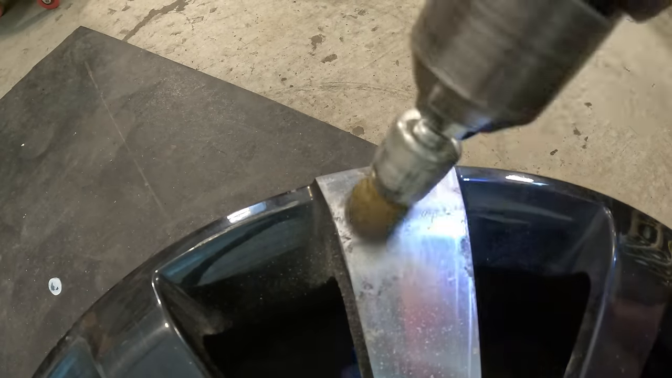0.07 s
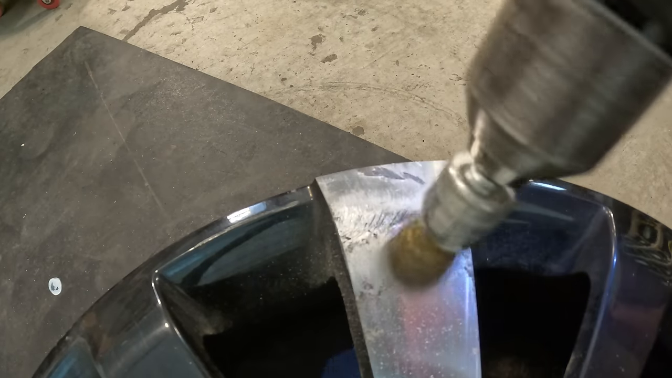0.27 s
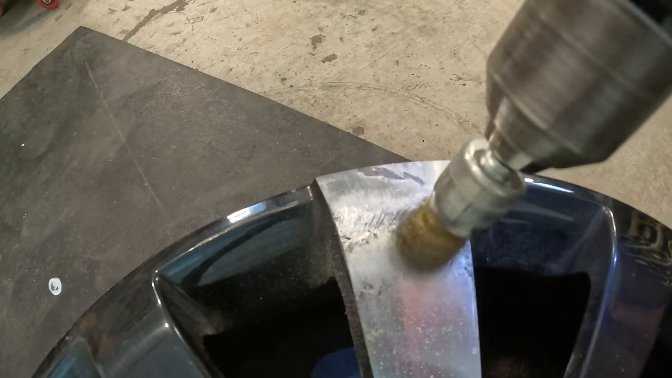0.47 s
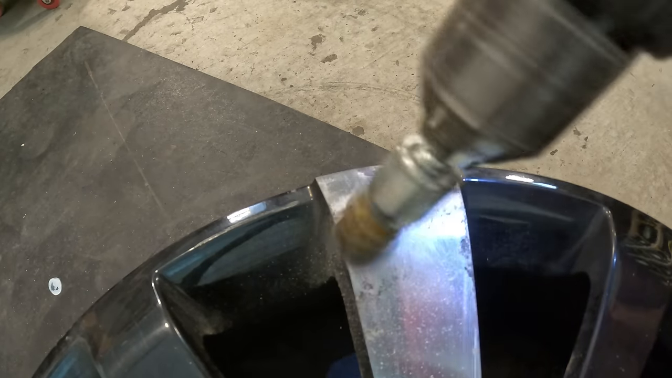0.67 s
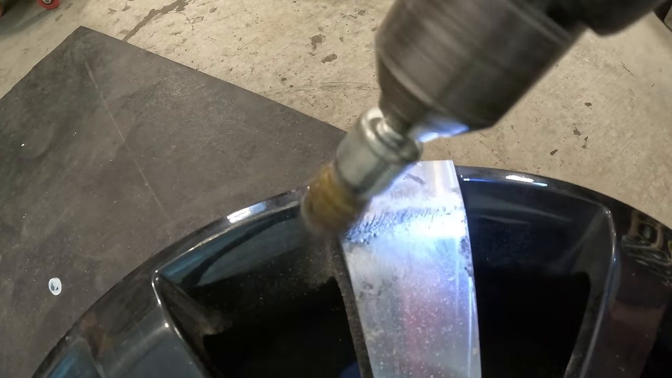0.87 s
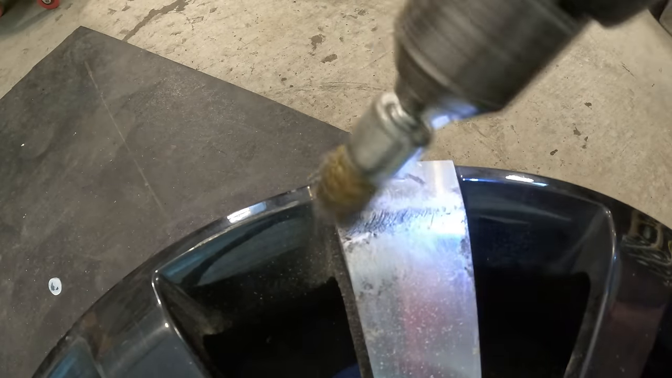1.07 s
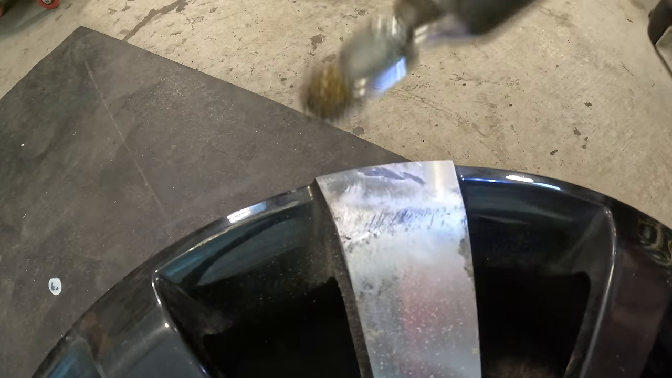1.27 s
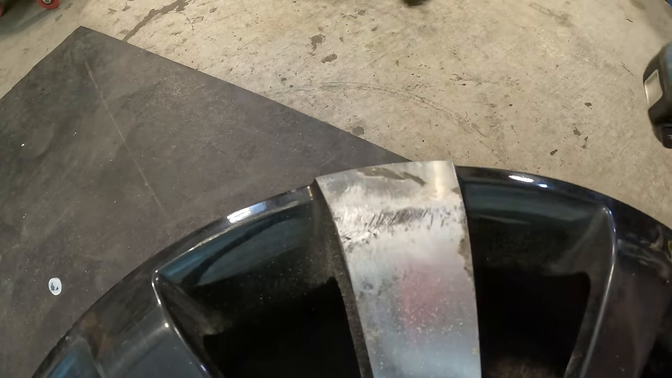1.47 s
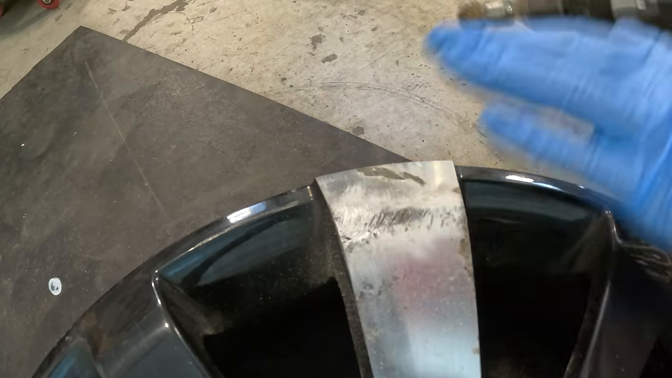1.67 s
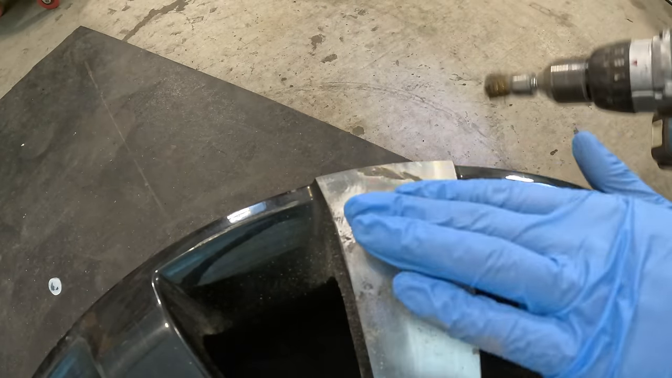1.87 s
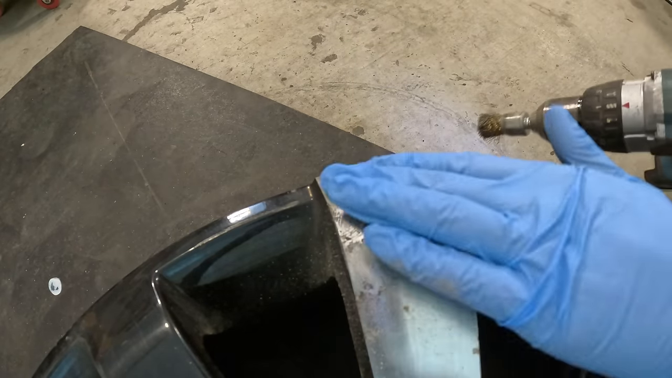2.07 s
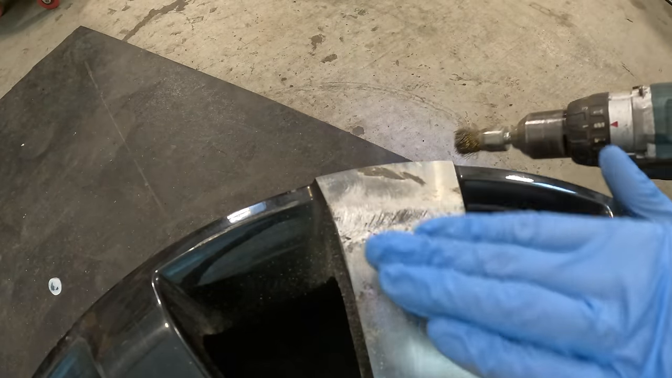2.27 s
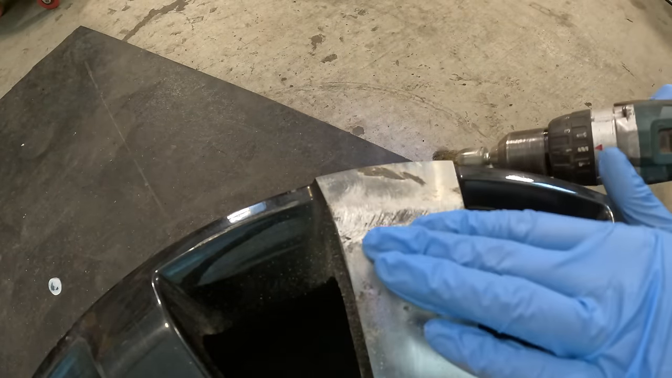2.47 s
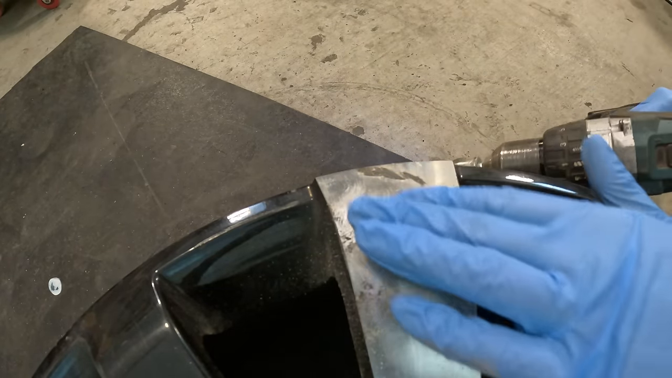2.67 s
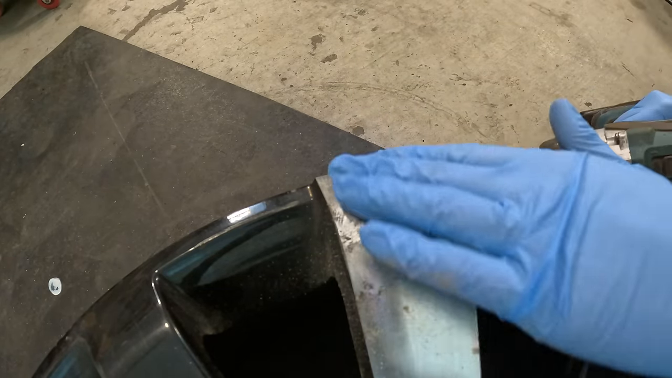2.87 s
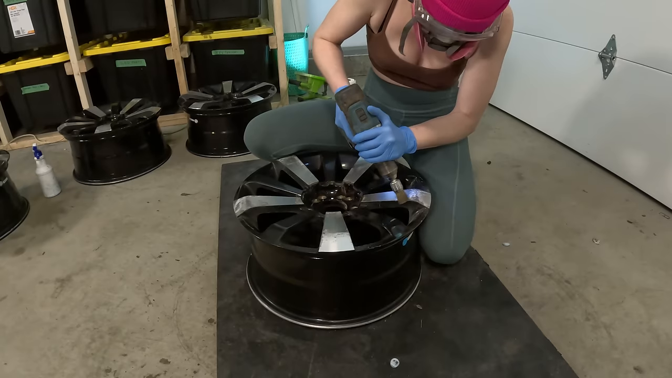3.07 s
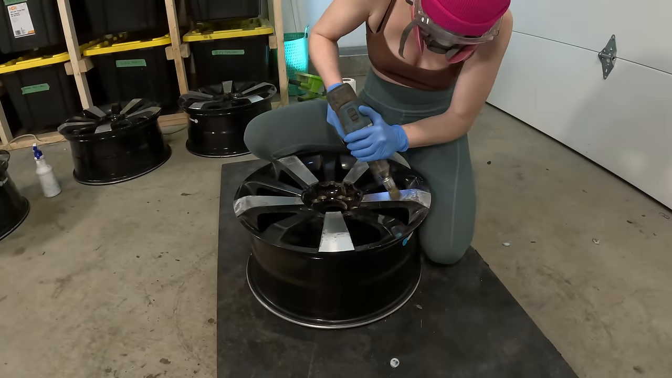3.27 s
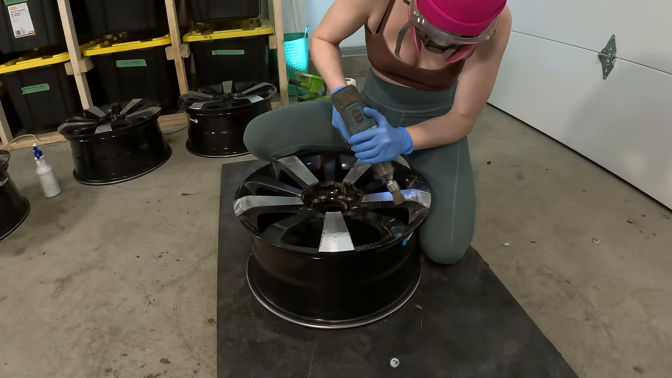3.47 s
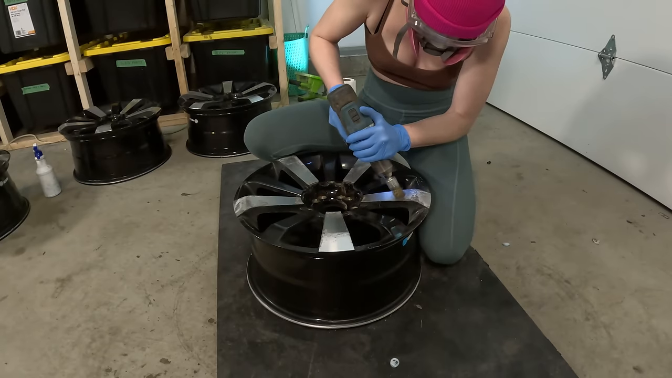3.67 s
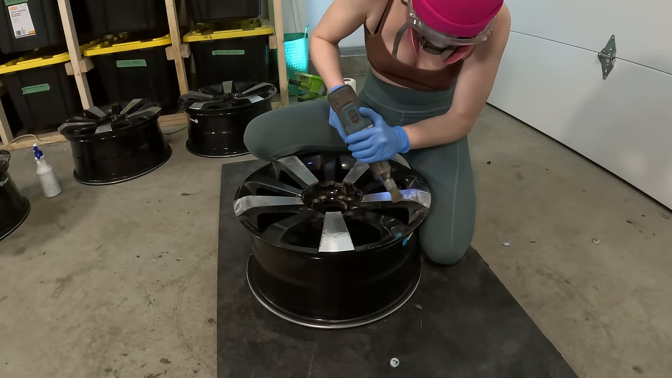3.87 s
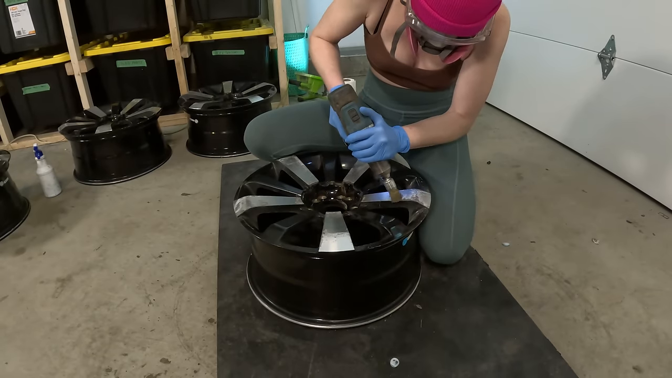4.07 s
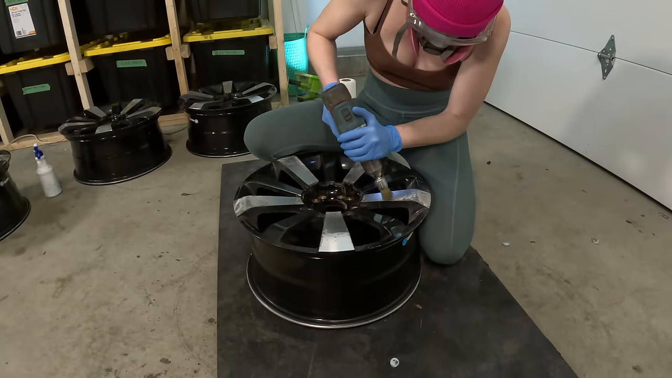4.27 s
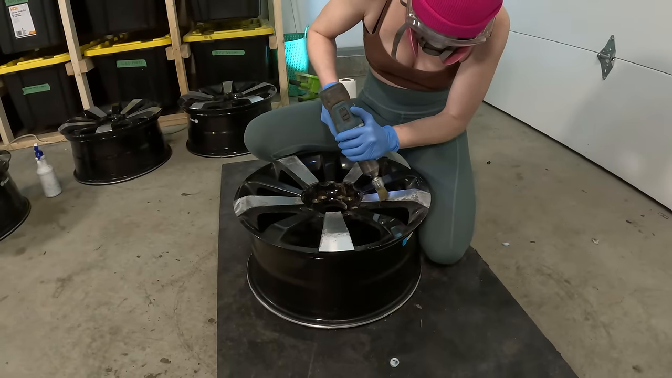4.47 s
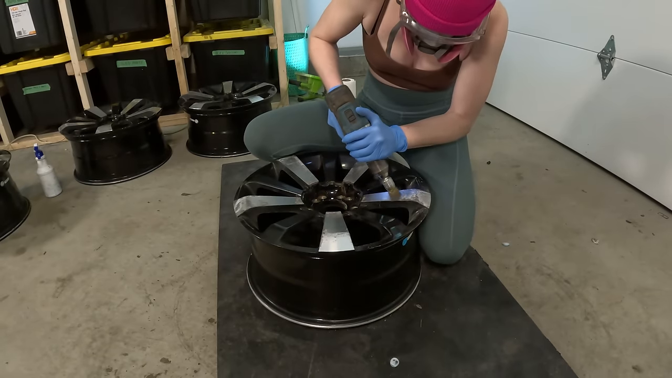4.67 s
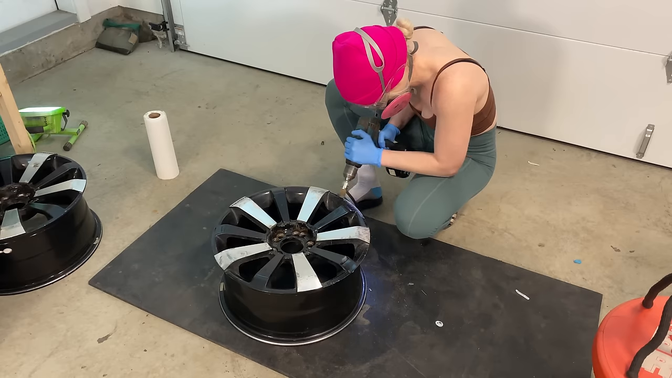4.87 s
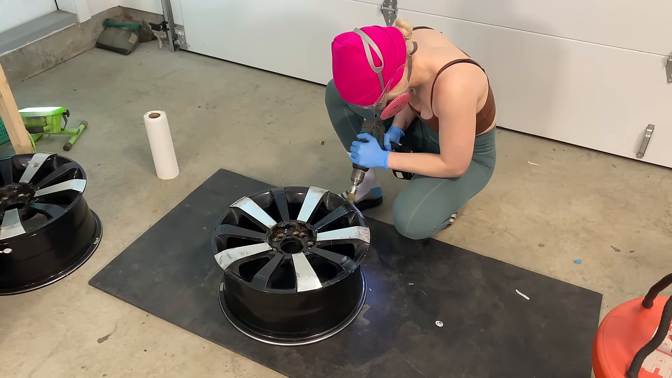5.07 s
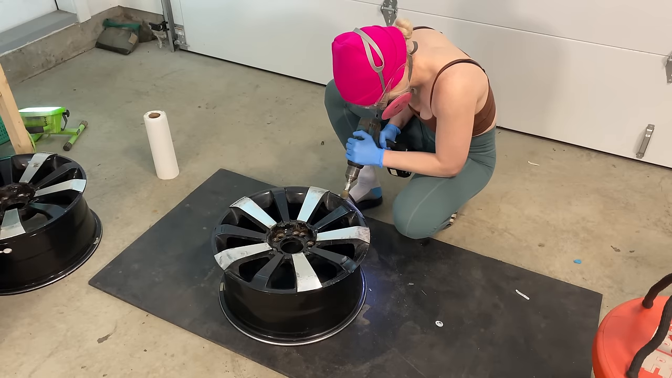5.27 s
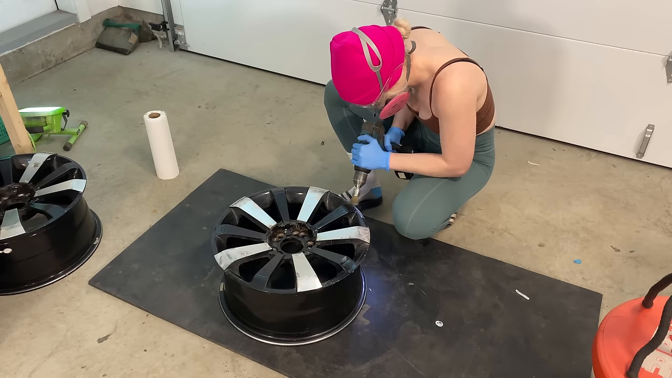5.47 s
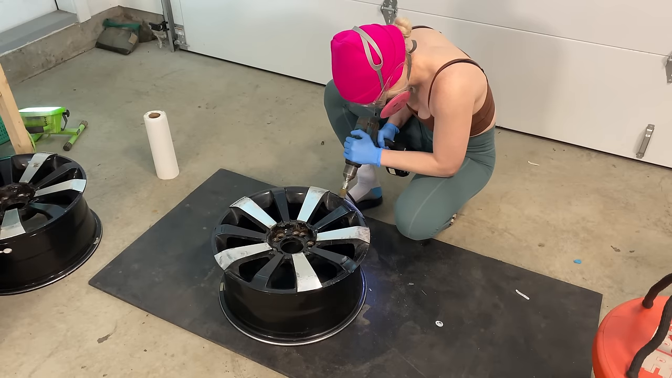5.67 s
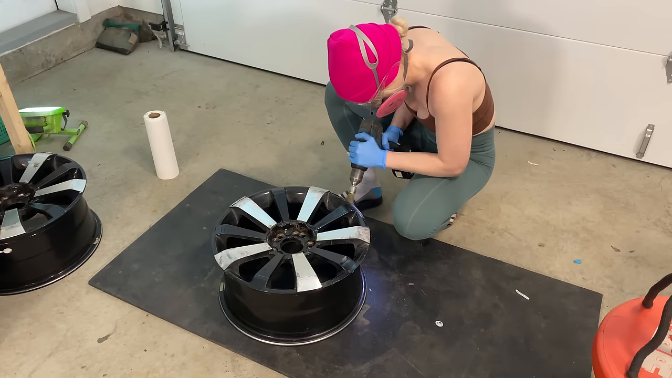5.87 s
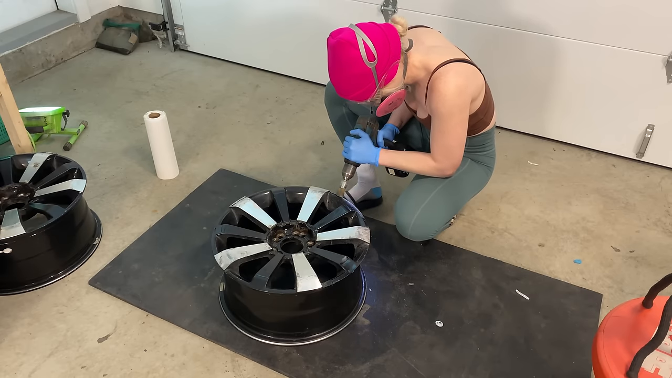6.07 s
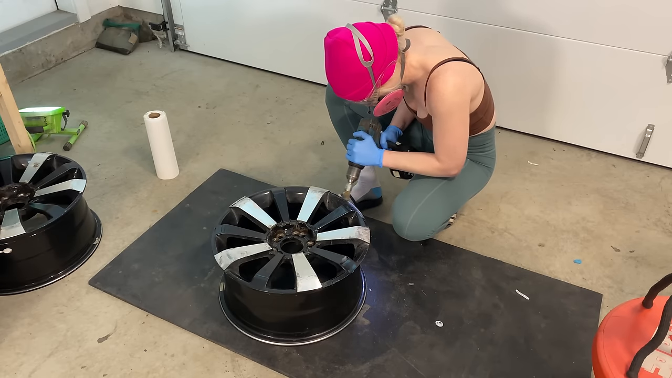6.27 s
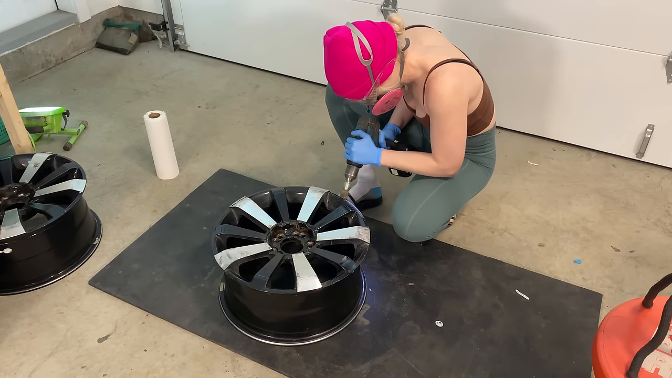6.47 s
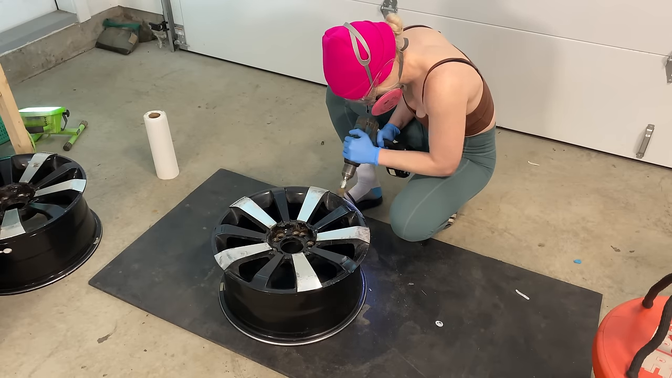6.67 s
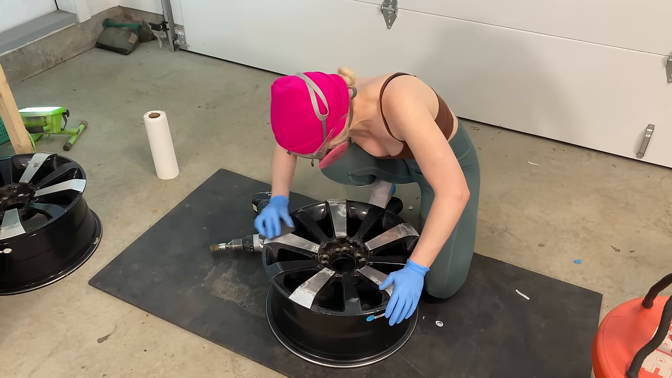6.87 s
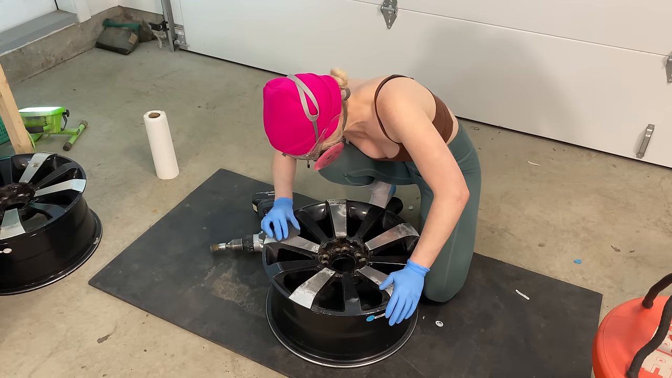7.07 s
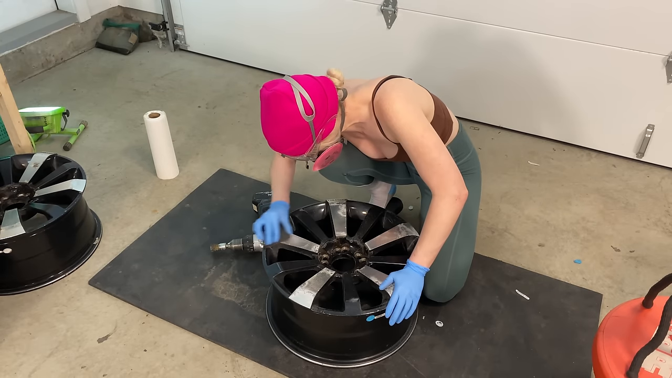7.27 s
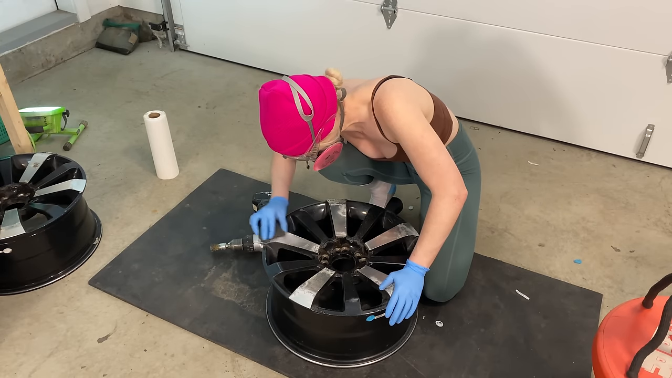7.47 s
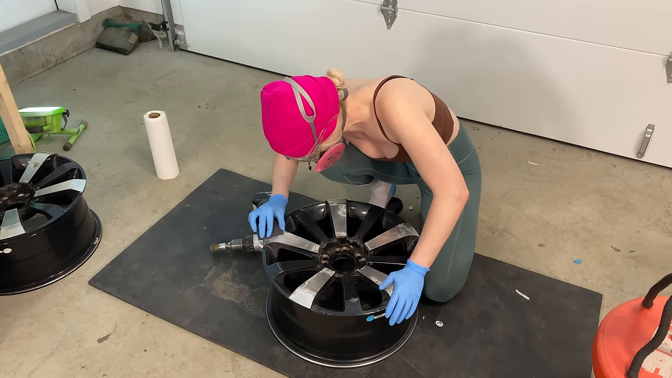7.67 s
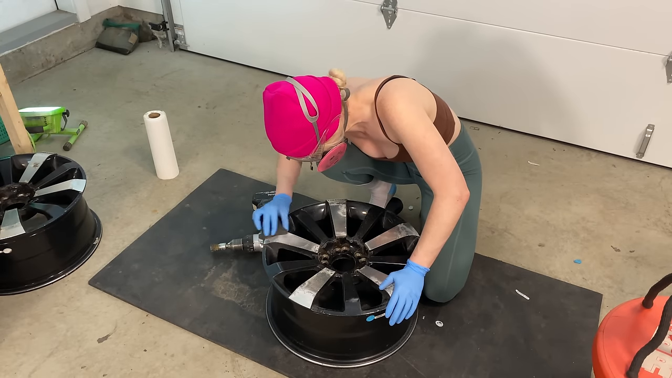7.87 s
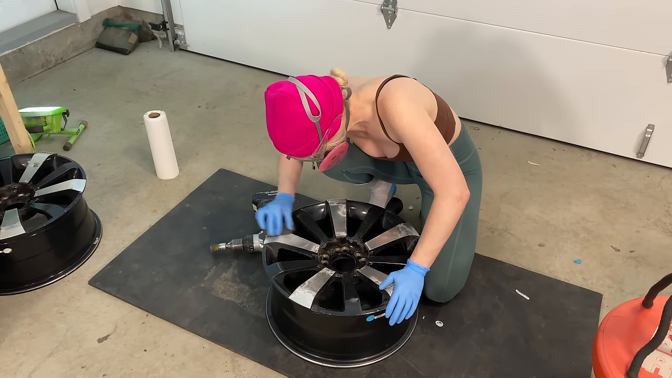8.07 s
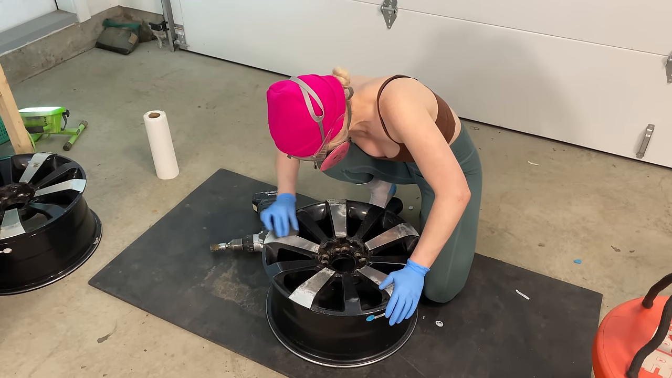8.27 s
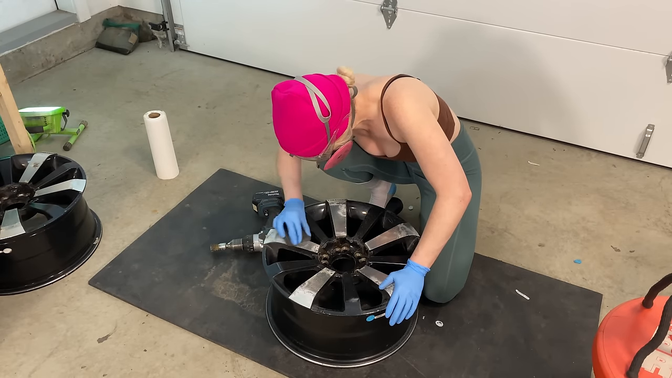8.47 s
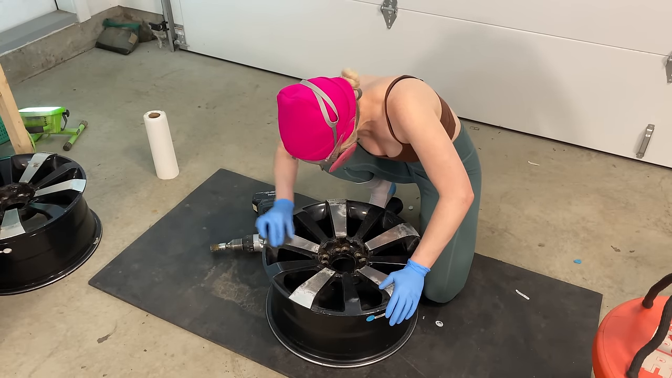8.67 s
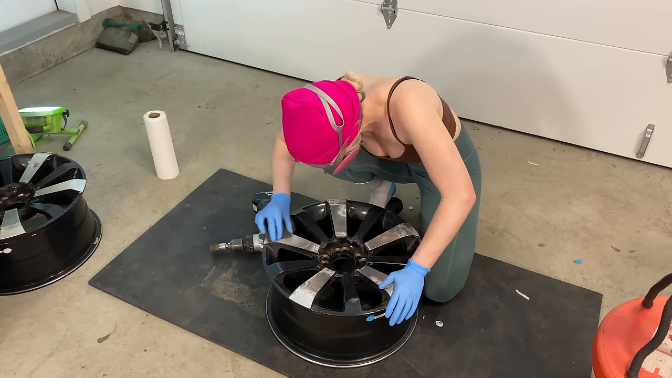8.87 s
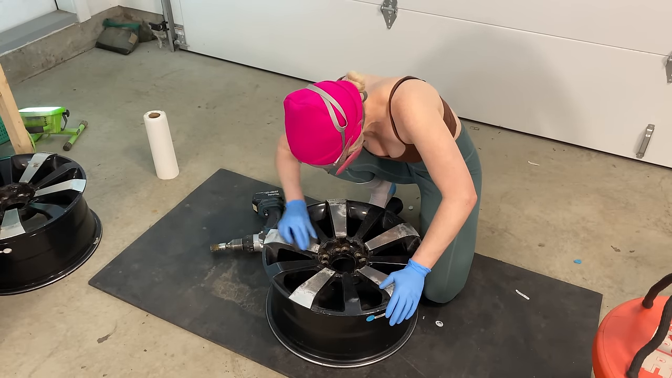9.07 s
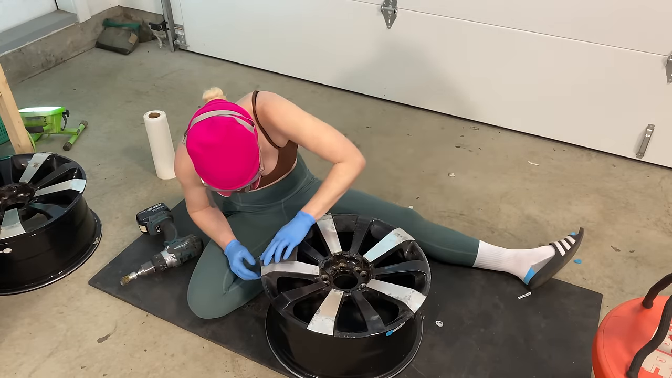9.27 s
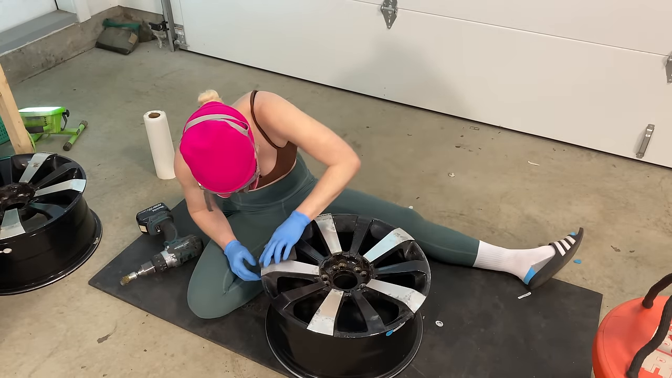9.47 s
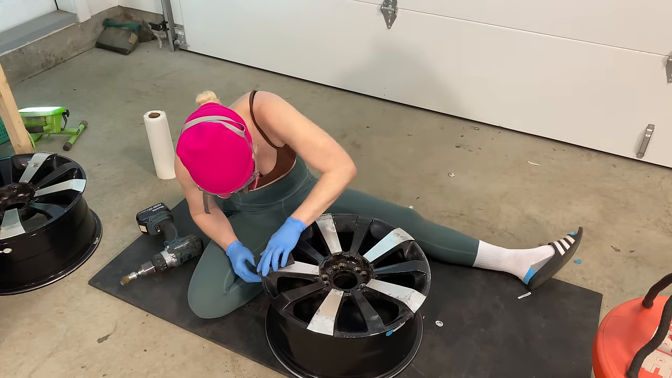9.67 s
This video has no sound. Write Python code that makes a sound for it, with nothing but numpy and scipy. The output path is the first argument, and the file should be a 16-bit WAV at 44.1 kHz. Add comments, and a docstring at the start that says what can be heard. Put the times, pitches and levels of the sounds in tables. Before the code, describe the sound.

A spinning wire brush rasps against an alloy wheel near the microphone, over the steady whine of a cordless drill, and halts with a clack. Quiet, slightly squeaky glove rubbing fills the pause. The whirring scrape then runs again, heard from two more distant spots in the garage, its tone shifting between them. Rapid back-and-forth sandpaper scratching on the rim finishes the sequence, with a faint low room rumble underneath.

```python
"""In a garage, a cordless drill spins a small wire brush against an alloy car wheel, in three passes heard
from three places. After the first the drill brakes with a clack and a gloved hand wipes the spoke; after
the last the rim is sanded by hand. Motor and gears whine at fixed multiples of one shaft speed, while
the impacts of countless wire tips and grits make a broadband noise that drives the metal's resonances."""
import sys
import numpy as np
from scipy import signal
from scipy.fft import rfft, irfft, next_fast_len
from scipy.io import wavfile

SR = 44100
rng = np.random.default_rng(int(sys.argv[2]) if len(sys.argv) > 2 else 0)


def waveform_to_disk(signal):
    """Save audio, clipped to [-1, 1], as 16-bit WAV at the path in sys.argv[1]."""
    frames = np.transpose(np.atleast_2d(signal))
    scaled = np.clip(frames, -1, 1) * 32767
    samples = np.round(scaled).astype(np.int16)
    wavfile.write(sys.argv[1], SR, samples)


N = 427769
TIME = np.arange(N) / SR
CLOSE_END, FRONT_START, SIDE_START, SIDE_END, SLOW_START = 1.272, 3.037, 4.806, 6.742, 9.28   # t/s

# modes of the wheel: f/Hz, bandwidth/Hz, relative gain/dB
WHEEL_MODES = [(1079, 21.5, 19), (1154, 7.5, 19.5), (2060, 13, -6), (2837, 29, 5.5), (3200, 21, 5),
               (3380, 76, 2), (3920, 32, 4), (4150, 77, 3.5), (5220, 220, -4), (6200, 44, 0),
               (7130, 27, -3), (9300, 140, -21)]
# spectrum of the brush at close range: f/Hz, relative level/dB
CLOSE_SPECTRUM = [(40, -6), (130, -4.5), (230, -11), (300, -19.5), (600, -9), (850, -11.5), (1200, -1.5),
                  (2300, -3), (3800, 1), (4600, -3.5), (7500, -9.5), (10300, -17.5), (11700, -33.5),
                  (14000, -33), (15700, -56.5)]


def from_db(db):
    """Amplitude ratio of a level: tenfold for every 20 dB."""
    return 10 ** (np.asarray(db) / 20)


def rms_one(x):
    """Normalisation to unit mean power."""
    return x / np.sqrt(np.mean(x ** 2) + 1e-20)


def tone(hz):
    """Simple harmonic motion of unit rms."""
    return np.sqrt(2) * np.sin(2 * np.pi * hz * TIME)


def in_time(rows):
    """Linear interpolation between rows of t/s, value."""
    return np.interp(TIME, *np.transpose(rows))


def between(start, end):
    """A time window with edges of a few milliseconds."""
    return np.clip((TIME - start) / .002, 0, 1) * np.clip((end - TIME) / .004 + 1, 0, 1)


def humps(rows):
    """Superposed Gaussian pulses, each given as peak t/s, duration/s, height."""
    return sum(height * np.exp(-(2 * (TIME - s) / length) ** 2) for s, length, height in rows)


def drift(corner_hz):
    """Random fluctuation: low-passed noise of unit rms."""
    step = 40   # samples between computed points
    r = np.exp(-2 * np.pi * corner_hz * step / SR)
    slow = signal.lfilter([1], [1, -2 * r, r * r], rng.standard_normal(N // step + 2002))[2000:]
    return np.interp(np.arange(N) / step, np.arange(len(slow)), rms_one(slow))


def coloured(x, spectrum):
    """Source and filter: a flat excitation takes on a smooth spectral envelope, at unit rms."""
    size = next_fast_len(N)
    hz, db = np.transpose(spectrum)
    bins = np.maximum(np.arange(size // 2 + 1) * SR / size, 1)
    gain = from_db(np.interp(np.log(bins), np.log(hz), db))
    return rms_one(irfft(rfft(x, size) * gain, size)[:N])


def scratches(per_s, spread_db):
    """Shot noise: tiny catches on the metal, at random moments and of random size."""
    sizes = from_db(spread_db * np.minimum(rng.exponential(1, N), 4)) * rng.choice([-1, 1], N)
    return rms_one(sizes * (rng.random(N) < per_s / SR))


def ringing(x, modes, ring_db):
    """Forced vibration: the excitation plus the narrow resonances that it drives, at unit rms."""
    out = x.copy()
    for hz, width, db in modes:
        r = np.exp(-np.pi * width / SR)
        numerator = np.array([1, 0, -1]) * (1 - r * r) / 2
        denominator = [1, -2 * r * np.cos(2 * np.pi * hz / SR), r * r]
        out += from_db(db + ring_db) * signal.lfilter(numerator, denominator, x)
    return rms_one(out)


def garage(x, echo_db, t60, side_db):
    """Reverberation: dense reflections decay exponentially; side_db sets how far left and right differ."""
    t = np.arange(SR // 2) / SR
    echoes = rng.standard_normal((2, len(t))) * from_db(-60 * t / t60) * (t > .003)
    echoes /= np.sqrt(np.sum(echoes ** 2, axis=1, keepdims=True))
    common, side = signal.fftconvolve(x[None], echoes, axes=1)[:, :N]
    mid = (x + from_db(echo_db) * common) / np.sqrt(1 + from_db(2 * echo_db))
    return mid + from_db(side_db) * side * [[1], [-1]]


def air():
    """Ambient noise: a low rumble, a faint mains hum and, near the end, a deep drone."""
    # still air of the garage: f/Hz, relative level/dB
    spectrum = [(20, 5.5), (35, -2.5), (100, -15), (220, -6.5), (320, -17), (800, -18), (2000, -27),
                (8000, -40), (15000, -53)]
    rumble = from_db(-69.5) * coloured(rng.standard_normal(N), spectrum)
    hum = from_db(-75.5) * tone(hz=60.4)
    drone = from_db(-67) * tone(hz=27.1) * between(SLOW_START, N / SR)
    return garage(rumble, echo_db=-6, t60=.94, side_db=-30) + hum + drone


def bumps():
    """Damped free vibration after a push: the slower the push, the less it excites the higher modes."""
    # pushes as the work is shifted: t/s, level/dB, duration/s
    pushes = [(1.249, -47, .006), (1.296, -36, 0.0063), (1.356, -33, 0.0064), (1.47, -47, 0.0099),
              (1.622, -44.5, 0.011), (7.48, -67, 0.0064), (7.7, -44.5, .016), (7.93, -58, 0.013),
              (8.1, -56.5, 0.014)]
    # modes of the deep wobble: f/Hz, relative level/dB, T60/s
    modes = [(25.9, 9.5, 0.65), (36, -12, .25), (61, -10, 0.28), (91.4, 1.5, 0.42), (122, -5, 0.21)]
    out = np.zeros(N)
    for s, db, length in pushes:
        t = TIME[:N - int(s * SR)]
        onset = 1 - np.exp(-(t / (2 * length)) ** 2)
        for hz, mode_db, t60 in modes:
            excitation = np.exp(-(hz * length) ** 2)
            decay = from_db(db + mode_db - 60 * t / t60)
            out[N - len(t):] += excitation * onset * decay * np.sin(2 * np.pi * hz * t)
    return out


def impacts(events, spectrum):
    """Impact transients: noise with an abrupt rise and an exponential decay."""
    envelope = np.zeros(N)
    for s, db, t60 in events:
        attack = np.clip((TIME - s) / .00064, 0, 1)
        envelope += attack * from_db(db - 60 * np.clip((TIME - s) / t60, 0, 2))
    return envelope * coloured(rng.standard_normal(N), spectrum)


def stroke_gain(strokes, rest_db):
    """Incoherent addition: the powers of the hand's strokes and of its creeping between them add."""
    power = sum(humps([(s, length, from_db(db))]) ** 2 for s, length, db in strokes)
    return np.sqrt(from_db(rest_db) ** 2 + power)


def glove():
    """Sliding friction: rubber rubs the spoke, and stick-slip motion now and then makes it sing."""
    # rubber on metal: f/Hz, relative level/dB
    spectrum = [(200, 6), (650, -14.5), (830, -34), (1100, -7.5), (1700, -4), (3300, -0.5), (4600, -2),
                (7300, 1.5), (8300, -2), (10300, -5), (11500, -16), (14000, -23), (15500, -41)]
    # strokes over the spoke: peak t/s, duration/s, level/dB
    wipes = [(1.719, 0.15, -59.5), (2.078, 0.18, -60), (2.31, 0.23, -56), (2.818, 0.28, -58.5),
             (3.017, 0.057, -56)]
    # stick-slip tones: peak t/s, duration/s, f/Hz, level/dB
    squeaks = [(1.772, .08, 2136, -73), (2.04, 0.07, 1070, -65.5), (2.375, 0.11, 2136, -64.5),
               (2.38, 0.1, 7300, -66), (2.717, 0.34, 1100, -71.5)]
    # light taps of the glove: t/s, level/dB, T60/s
    ticks = [(1.752, -57, 0.067), (1.88, -55, 0.079), (2.203, -48, 0.015), (2.24, -51, 0.098)]
    friction = coloured(scratches(per_s=9000, spread_db=2.6), spectrum)
    rub = ringing(friction, WHEEL_MODES, ring_db=7) * stroke_gain(wipes, rest_db=-79.5)
    contact = rub * between(CLOSE_END, FRONT_START) + impacts(ticks, spectrum)
    sing = sum(humps([(s, length, from_db(db))]) * tone(hz) for s, length, hz, db in squeaks)
    return garage(contact, echo_db=-4.5, t60=.33, side_db=-9) + sing


def sandpaper(spectrum, ring_db):
    """Abrasion noise: grits catch in clumps, and the faster the stroke, the brighter the hiss."""
    # pushes and pulls of the paper: peak t/s, duration/s, level/dB
    strokes = [(6.73, 0.08, -46), (6.825, 0.16, -41), (6.934, 0.13, -42), (7.063, 0.12, -41),
               (7.175, 0.25, -43.4), (7.318, 0.101, -41), (7.418, 0.17, -43.5), (7.545, 0.096, -42),
               (7.651, 0.13, -44), (7.78, 0.1, -43.5), (7.875, 0.093, -45.4), (7.989, 0.08, -43.5),
               (8.092, 0.15, -44), (8.219, 0.092, -43.7), (8.323, 0.15, -46), (8.461, 0.17, -44.1),
               (8.586, 0.108, -43), (8.716, 0.24, -43.5), (8.869, 0.13, -43.1), (8.992, 0.16, -43.5),
               (9.168, 0.21, -43), (9.365, 0.098, -46), (9.491, 0.094, -49), (9.641, 0.088, -44)]
    grit = scratches(per_s=12000, spread_db=2.3) * from_db(.23 * drift(90))
    rub = ringing(coloured(grit, spectrum), WHEEL_MODES, ring_db)
    body = signal.sosfiltfilt(signal.butter(1, 6000, fs=SR, output="sos"), rub)
    effort = stroke_gain(strokes, rest_db=-53.5)
    hiss = (rub - body) * (effort / from_db(-46)) ** .49   # the treble grows faster than the body
    return garage((body + hiss) * effort, echo_db=-9, t60=.077, side_db=-68)


def sanding():
    """Abrasion of the rim under two spectral envelopes: first quick and fine, then slower and duller."""
    # quick and slow sanding: f/Hz, relative level/dB
    quick_spectrum = [(100, -40), (180, -43), (280, -12.5), (550, -10.5), (900, -10.5), (1300, -8),
                      (2150, -2), (3800, -3.5), (6500, -1), (9000, 0), (10500, -6.5), (13300, -4),
                      (15600, -11.5)]
    slow_spectrum = [(30, -7), (50, -1), (110, -23), (300, -11), (600, -9.5), (950, -8.5), (1150, -9.5),
                     (1500, -4), (2350, -0.5), (3300, -7), (6000, -6), (9000, -6), (10500, -14),
                     (13500, -11), (15600, -18)]
    quick = sandpaper(quick_spectrum, ring_db=-9.5) * between(SIDE_END, SLOW_START)
    slow = sandpaper(slow_spectrum, ring_db=-9) * between(SLOW_START, N / SR)
    return quick + slow


def brake():
    """Impact and exponential decay: the chuck clacks to a halt and the whirr dies away."""
    # clacks of brake and chuck: t/s, level/dB, T60/s
    clacks = [(1.251, -24, 0.023), (1.2625, -20.5, 0.032), (1.265, -26.5, 0.015), (1.2685, -28.5, 0.038),
              (1.277, -30, 0.011), (1.302, -35.5, 0.037), (1.323, -35.5, 0.075)]
    # spectrum of a clack: f/Hz, relative level/dB
    spectrum = [(88, -60.5), (150, -15), (314, -3.5), (781, -5.5), (1450, -2.5), (2140, -4.5), (3160, -7.5),
                (3760, -2.5), (5230, -8.5), (7710, -11.5), (15500, -44)]
    start_db, fall_db_per_s = -45.5, 111
    decay = from_db(start_db - fall_db_per_s * np.clip(TIME - CLOSE_END, 0, 1))
    whirr = ringing(coloured(rng.standard_normal(N), CLOSE_SPECTRUM), WHEEL_MODES, ring_db=-23.5)
    run_out = whirr * decay * between(CLOSE_END, FRONT_START)
    return garage(impacts(clacks, spectrum) + run_out, echo_db=-11, t60=.6, side_db=-16)


def shaft(speed_hz):
    """Phase is the integral of frequency: the turns made so far by a slightly unsteady motor."""
    return np.cumsum(speed_hz * (1 + .001 * drift(8))) / SR


def whine(turns, orders, flutter):
    """Shaft orders: tones locked to the motor, modulated in amplitude and phase by play in the gears."""
    out = np.zeros(N)
    for order, db in orders:
        amplitude = from_db(db) * (1 + flutter * drift(31))
        out += amplitude * np.sin(2 * np.pi * order * turns + flutter * drift(12.3))
    return out * np.sqrt(2 / (1 + flutter ** 2))


def mesh(turns, level_db, order, flutter):
    """Gear-mesh tone: teeth meet order times in each turn of the motor."""
    return whine(turns, [(order, 0)], flutter) * from_db(level_db)


def wires(turns, spectrum, throb, grain_db):
    """Modulated shot noise: wire tips drag over the wheel, a little harder once per turn of the chuck."""
    gear_ratio = .217   # chuck turns per motor turn
    bite = (1 + throb * np.sin(2 * np.pi * turns * gear_ratio)) * from_db(.39 * drift(60))
    return coloured(scratches(per_s=14000, spread_db=grain_db) * bite, spectrum)


def close_pass():
    """Transient loading, heard beside the brush: the gear tone leaps whenever the wires snag."""
    # motor speed: t/s, f/Hz
    speed = [(0.0, 149.3), (0.55, 148.2), (1.0, 149.5), (1.25, 149.0)]
    # motor and gear tones: shaft order, level/dB
    orders = [(3, -66.5), (4, -63.5), (5, -60.5), (6, -54), (7, -49), (7.25, -53.5), (8, -51), (9, -50.5),
              (10, -55), (12.5, -48), (15.8, -59), (17.05, -52), (18.9, -54), (26.5, -54.5)]
    # scrape as the brush is pressed and finally lifted: t/s, level/dB
    pressing = [(0.0, -32.5), (0.5, -35), (1.08, -33), (1.24, -37.5)]
    # snags on the edge of the spoke: peak t/s, duration/s, strength 0-1
    snags = [(0.04, 0.058, 1.0), (0.75, 0.059, 0.94), (0.98, 0.042, .9), (1.08, 0.081, .9)]
    snag = humps(snags)
    turns = shaft(in_time(speed))
    tips = wires(turns, CLOSE_SPECTRUM, throb=.056, grain_db=3.5)
    scrape = ringing(tips, WHEEL_MODES, ring_db=-14.5) * from_db(in_time(pressing) - .2 * snag)
    gears = mesh(turns, level_db=-54 + 16 * snag, order=7.8, flutter=.43)
    gears += whine(turns, orders, flutter=.57)
    return garage(scrape, echo_db=-6, t60=.21, side_db=-7.5) + gears


def front_pass():
    """Unloading, heard from the front: as the brush eases off, the motor speeds up and the mesh fades."""
    # brush from the front: f/Hz, relative level/dB
    spectrum = [(40, -30), (200, -17), (330, -19.5), (600, -11.5), (1150, -3), (1900, -4.5), (2800, -3),
                (3500, 2.5), (4200, 0.5), (5000, -3.5), (7500, -6.5), (10400, -16.5), (11700, -27),
                (14000, -32), (15500, -51)]
    # tones before and after the drill is leaned to a new angle: shaft order, level/dB
    upright_orders = [(.217, -55), (.434, -67), (2.93, -67), (5.94, -60), (7.7, -56), (9.17, -56),
                      (10.8, -60), (16.2, -58), (18, -55), (18.92, -50.5), (19.8, -55), (24.3, -59),
                      (27, -47), (27.5, -55), (28.7, -55), (37.8, -61), (53.04, -64)]
    tilted_orders = [(.217, -63), (2.92, -62), (5.82, -63), (8.2, -62), (16.2, -60), (18, -55),
                     (18.92, -50.5), (19.82, -48.5), (24.35, -54), (27.03, -48)]
    # easings of the pressure: peak t/s, duration/s, strength 0-1
    easings = [(3.06, 0.19, 0.95), (3.32, 0.085, 0.31), (3.455, .11, 0.94), (4.46, 0.1122, 0.79),
               (4.72, .38, 0.94)]
    ease = humps(easings)
    turns = shaft(speed_hz=148.6 + 1.9 * ease)
    tilt = np.clip((TIME - 4.41) / .056 + .5, 0, 1)
    tips = wires(turns, spectrum, throb=.033, grain_db=1.5)
    scrape = ringing(tips, WHEEL_MODES, ring_db=-12.5) * from_db(-37.5)
    gears = (1 - tilt) * whine(turns, upright_orders, flutter=.25)
    gears += tilt * whine(turns, tilted_orders, flutter=.2)
    gears += mesh(turns, level_db=-45.5 - 8.5 * ease, order=9, flutter=.11)
    return garage(scrape, echo_db=-5.5, t60=.1, side_db=-7.5) + gears


def side_pass():
    """Frictional drag, heard across the floor: speed, scrape and mesh tone sag at each turnabout."""
    # brush from the side: f/Hz, relative level/dB
    spectrum = [(60, -26), (190, -21), (370, -15.5), (480, -7), (950, -8), (1500, -2.5), (2900, -3),
                (3700, 2.5), (5100, -1), (7500, -5.5), (9400, -7.5), (10200, -15), (13700, -15),
                (15700, -18)]
    # bright modes of the wires and their cup: f/Hz, bandwidth/Hz, relative gain/dB
    brush_modes = [(3660, 78, -7), (5000, 44, -21), (8530, 100, 1), (9420, 160, 0), (11400, 140, 5),
                   (13620, 70, 0)]
    # motor and gear tones: shaft order, level/dB
    orders = [(3, -61), (4, -65), (5, -63), (6, -67), (9, -65), (12.75, -62), (16, -58), (16.83, -57),
              (17.55, -57), (20.8, -61), (28.1, -63), (33.7, -58), (63.3, -66), (91.3, -68)]
    # turnabouts of the to-and-fro sweep: peak t/s, duration/s, strength 0-1
    turnabouts = [(4.88, 0.1198, 0.9), (5.24, 0.23, 0.58), (5.6, 0.18, 0.94), (6.03, 0.129, 1.0),
                  (6.39, 0.128, 0.82), (6.75, .17, .6)]
    drag = humps(turnabouts)
    turns = shaft(speed_hz=150.15 - 2.2 * drag)
    tips = wires(turns, spectrum, throb=.084, grain_db=2.5)
    scrape = ringing(tips, brush_modes, ring_db=-4) * from_db(-40.5 - 2.3 * drag)
    gears = mesh(turns, level_db=-47 - 4.5 * drag, order=8, flutter=.22)
    gears += whine(turns, orders, flutter=.25)
    return garage(scrape, echo_db=-2, t60=.18, side_db=-69) + gears


def scene():
    """Superposition: drill passes, wipe and sanding follow one another over bumps and ambient noise."""
    near = close_pass() * between(0, CLOSE_END) + brake() + glove()
    near += front_pass() * between(FRONT_START, SIDE_START)
    side = side_pass() * between(SIDE_START, SIDE_END)
    balance = from_db([[-.35], [.35]])   # slightly to the right
    return near * balance + side + sanding() + bumps() + air()


def record(dry):
    """Band limiting: a steep elliptic low-pass removes the highest treble."""
    cutoff_hz = 15650
    return signal.sosfilt(signal.ellip(12, .1, 80, cutoff_hz, fs=SR, output="sos"), dry)


dry = scene()
out = record(dry)
waveform_to_disk(out)
```